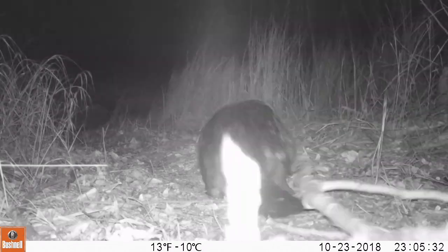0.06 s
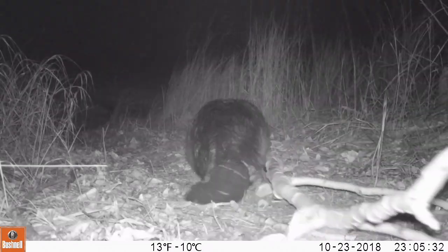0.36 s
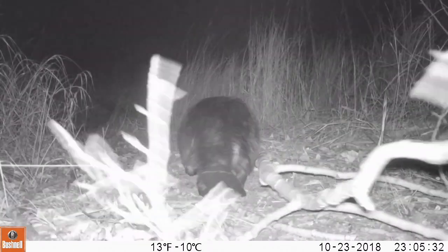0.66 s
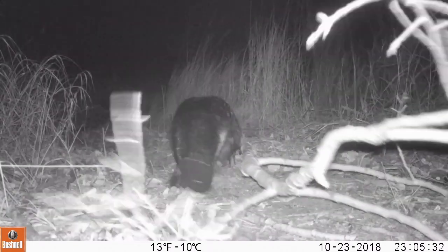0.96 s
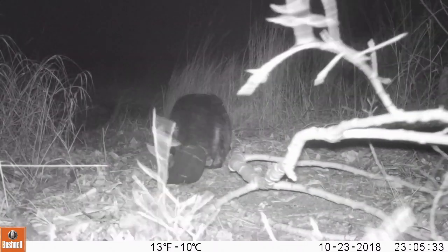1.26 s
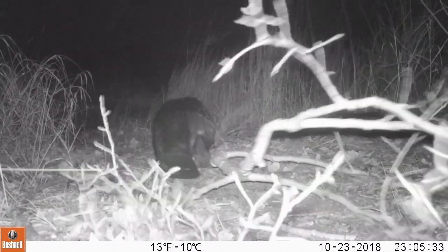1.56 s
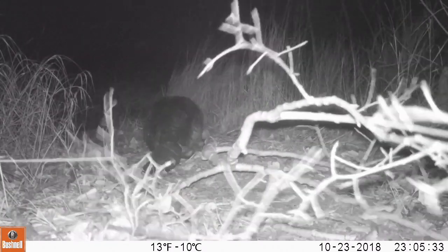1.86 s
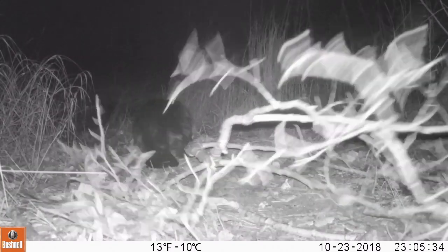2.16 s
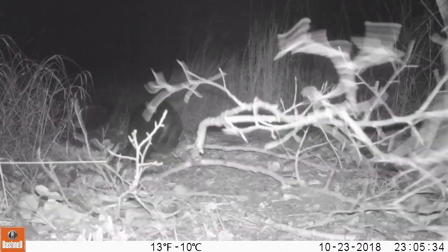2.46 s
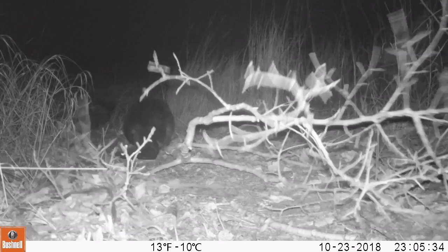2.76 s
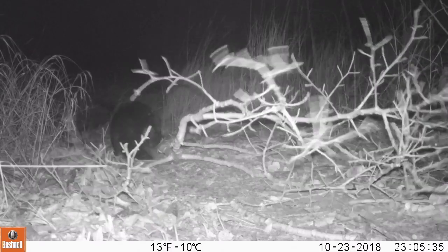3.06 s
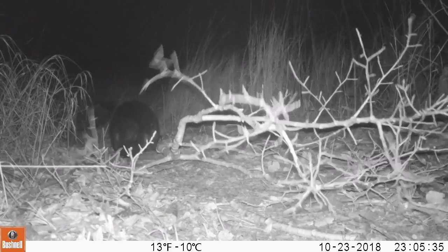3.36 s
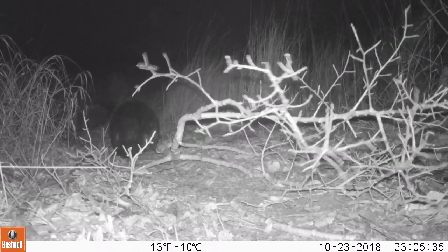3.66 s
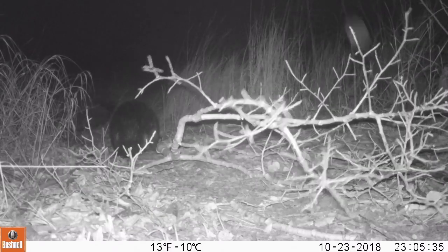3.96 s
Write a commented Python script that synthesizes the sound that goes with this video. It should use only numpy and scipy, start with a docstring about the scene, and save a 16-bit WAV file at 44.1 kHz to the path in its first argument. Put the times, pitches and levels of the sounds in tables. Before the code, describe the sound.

A big branch drags over dry leaves from the start, close by, with dense bright crackling, woody scraping and soft low bumps. It is loudest in the first second, where sharp twig snaps come thick and fast. The rustling then gradually recedes, with scattered weaker snaps, and stops at about 3.3 seconds. A few tiny ticks follow around 3.5 seconds as it settles over faint night hiss.

```python
"""A big dead branch, dragged by a beaver over dry leaves at night, passes close by, recedes and stops.
Twig tips rake the litter into a dense, bright crackle. Stick-slip friction makes the limb scrape and
rub, and bumps on the ground ring its low modes. Twigs snap by brittle fracture or brush past, and a few
leaves settle over the faint hiss and rumble of the night and a small mono microphone."""
import sys
import numpy as np
from scipy import signal
from scipy.fft import rfft, irfft
from scipy.io import wavfile

SR = 44100
rng = np.random.default_rng(int(sys.argv[2]) if len(sys.argv) > 2 else 0)


def output_pcm(signal):
    """Save a mono or channel-first signal as 16-bit PCM at the path in sys.argv[1].

    Samples are clipped to [-1, 1] before scaling.
    """
    pcm = np.clip(np.atleast_2d(signal).T, -1, 1) * 32767
    wavfile.write(sys.argv[1], SR, np.round(pcm).astype(np.int16))


N = 176400
T = np.arange(N) / SR
SLIPS_PER_S, SLIP_SPREAD_DB = 3000, 2

# Relative strength of crackle and scrape along the drag: time_s, leaf_db, wood_db
DRAG = [(0.0, -29.9, -41), (0.07, -32, -45.8), (0.1, -27, -41.5), (0.3, -25, -38.9), (0.41, -25.5, -40.5),
        (0.49, -28, -40), (0.54, -30, -43), (0.66, -29, -45.5), (0.77, -31.5, -49.5), (0.8, -31, -44),
        (0.91, -31.5, -47), (1.02, -32, -44.5), (1.06, -34, -49.5), (1.12, -32.5, -46.5),
        (1.16, -33, -48.5), (1.41, -33, -48.5), (1.52, -36.5, -51.5), (1.58, -33.4, -49.8),
        (1.72, -35, -49.5), (1.77, -36, -52), (2.13, -34.5, -50), (2.17, -39.5, -52.2), (2.21, -35, -50.5),
        (2.3, -39.0, -53.5), (2.45, -36.5, -52), (2.54, -39, -53), (2.77, -40.5, -56), (2.9, -40, -56.5),
        (3.18, -42.2, -57), (3.28, -47, -63.2), (3.45, -60.5, -75), (3.59, -72.0, -79.4),
        (3.81, -81, -83.5), (3.99, -84, -84)]


def from_db(db):
    """Amplitude ratio of a level in decibels."""
    return 10 ** (np.asarray(db) / 20)


def rms_one(x):
    """Normalisation to unit rms."""
    return x / np.sqrt(np.mean(x ** 2) + 1e-20)


def in_time(rows):
    """Linear interpolation of a curve's columns at every sample."""
    times_s, *columns = np.transpose(rows)
    return [np.interp(T, times_s, column) for column in columns]


def drift(rate_hz):
    """Slow random modulation: low-passed noise of unit rms, one value per 40 samples, interpolated."""
    pole = np.exp(-80 * np.pi * rate_hz / SR)
    slow = signal.lfilter([1], [1, -2 * pole, pole * pole], rng.standard_normal(N // 40 + 2002))[2000:]
    return np.interp(np.arange(N) / 40, np.arange(len(slow)), rms_one(slow))


def response(spectrum, size=4096):
    """Minimum-phase impulse response with this spectral shape; peak 1."""
    hz, db = np.transpose(spectrum)
    grid_hz = np.maximum(np.arange(size // 2 + 1) * SR / size, 1)
    magnitude = from_db(np.interp(np.log(grid_hz), np.log(hz), db))
    causal_cepstrum = 2 * irfft(np.log(magnitude)) * (np.arange(size) < size // 2)
    ring = irfft(np.exp(rfft(causal_cepstrum)))
    return ring / np.abs(ring).max()


def at_pitch(shape, pitch_hz):
    """Transposition of a spectrum given in frequency ratios."""
    return [(ratio * pitch_hz, db) for ratio, db in shape]


def through(x, spectrum):
    """Source and filter: an excitation is convolved with the response of a spectrum."""
    return signal.fftconvolve(x, response(spectrum))[:N]


def add(out, start_s, sound):
    """Superposition of a sound from its start time."""
    start = int(np.clip(start_s * SR, 0, N - 1))
    out[start:start + len(sound)] += sound[:N - start]


def grains(per_s, spread_db):
    """Shot noise: random clicks, many small and a few large; rms 1."""
    sizes = from_db(spread_db * np.minimum(rng.exponential(1, N), 5))
    return rms_one(sizes * rng.choice([-1, 1], N) * (rng.random(N) < per_s / SR))


def leaf_crackle(catch):
    """Twig tips excite leaves with random impulses; with distance the crackles merge into a swish."""
    # Spectra of leaves close by and farther off: frequency_hz, gain_db
    near_spectrum = [(1000, -51), (2000, -36), (3500, -19.5), (5160, -8.5), (6000, -2), (6600, 1),
                     (7500, -2), (9400, -6.5), (11000, -11), (12800, -19), (15800, -24)]
    far_spectrum = [(1000, -51), (2000, -32), (3500, -22), (4200, -17), (4600, -18), (5000, -11.5),
                    (5700, -4.5), (6600, -0.4), (7500, -2.5), (9400, -7), (11000, -12), (12800, -20.5),
                    (15800, -29)]
    near_until_s, far_from_s = 0.6, 2.07
    near_crisp, far_crisp = 0.47, 0.25  # share of the power in distinct crackles
    level_db, _ = in_time(DRAG)
    far = np.clip((T - near_until_s) / (far_from_s - near_until_s), 0, 1)
    out = np.zeros(N)
    for spectrum, crisp, share in ((near_spectrum, near_crisp, 1 - far), (far_spectrum, far_crisp, far)):
        crackles = np.sqrt(crisp) * grains(per_s=1800, spread_db=1.5)
        swish = np.sqrt(1 - crisp) * rng.standard_normal(N)
        out += np.sqrt(share) * rms_one(through(crackles + swish, spectrum))
    return out * from_db(level_db - 0.23 + 0.9 * catch)


def wood_scrape(catch):
    """Stick-slip friction: tiny slips of bark and twigs excite the resonances of the branch."""
    # Spectrum of the scraped wood: frequency_hz, gain_db
    wood_spectrum = [(500, -25.5), (1080, -11), (1350, -7), (1900, -7.5), (2350, -5.5), (2750, -0.5),
                     (3300, -1.5), (4300, 0), (5500, -2.5), (9000, -28)]
    _, level_db = in_time(DRAG)
    scrape = through(grains(SLIPS_PER_S, SLIP_SPREAD_DB), wood_spectrum)
    return rms_one(scrape) * from_db(level_db - 0.5 + 0.82 * catch)


def soil_rub(catch):
    """Sliding friction: the heavy limb rubs dully over the frozen ground."""
    # Strength of the rub under the limb's weight: time_s, relative_db
    load_curve = [(0.0, -57), (0.01, -60), (0.28, -54), (0.71, -56), (0.75, -59.5), (0.85, -56),
                  (0.89, -59.5), (1.55, -61.5), (1.56, -59), (3.17, -69.5), (3.5, -83), (4.0, -82.5)]
    # Spectrum of the rubbed soil: frequency_hz, gain_db
    soil_spectrum = [(30, -22.5), (60, -14.5), (100, -0.5), (250, -0.5), (340, -2), (550, -1.5), (720, 2.5),
                     (880, 1), (1060, -2.5), (1400, -4), (3500, -19)]
    level_db, = in_time(load_curve)
    rub = through(grains(SLIPS_PER_S, SLIP_SPREAD_DB), soil_spectrum)
    return rms_one(rub) * from_db(level_db + 3 + 1.25 * catch)


def ground_echo(direct, delay_s=0.00042, cutoff_hz=1700, full_at_s=2.73):
    """Interference: as the branch recedes, the ground reflection grows and hollows out the midrange."""
    dull = signal.sosfilt(signal.butter(1, cutoff_hz, fs=SR, output="sos"), direct)
    reflected = np.interp(T - delay_s, T, dull)
    gain = 0.5 * np.minimum(T / full_at_s, 1)
    return (direct + gain * reflected) / np.sqrt(1 + gain ** 2)


def hiss(level_db=-72):
    """Stationary noise: the hiss and low rumble of the still night and the microphone."""
    # Spectrum of the noise floor: frequency_hz, gain_db
    floor_spectrum = [(15, -32.5), (25, -9), (34, -1.5), (60, -9), (130, -13), (270, -18.5), (500, -29),
                      (1000, -28), (2000, -29.5), (7000, -31), (15500, -31)]
    return from_db(level_db) * rms_one(through(rng.standard_normal(N), floor_spectrum))


def limb_bumps(rise_s=0.0069):
    """Damped modal vibration: soft blows ring the limb, a little differently each time."""
    # Blows of the limb on the ground: start_s, relative_db
    blows = [(0.038, -44), (0.17, -40), (0.245, -39), (0.352, -59), (0.454, -46), (0.718, -53),
             (0.798, -46), (0.938, -57), (1.03, -52), (1.248, -54), (1.692, -53), (1.801, -43),
             (2.049, -49), (2.427, -52), (2.849, -58), (2.998, -58)]
    # Low modes of the limb: frequency_hz, gain_db, t60_s
    limb_modes = [(95, 0, 0.11), (139, 4.5, 0.069), (195, -4, .08), (244, -5.5, 0.072)]
    out, t = np.zeros(N), T[:9000]
    onset = 1 - np.exp(-t / rise_s)
    for start_s, blow_db in blows:
        for hz, mode_db, t60_s in limb_modes:
            detune, force = rng.standard_normal(2)
            ring = np.sin(2 * np.pi * hz * (1 + 0.087 * detune) * t) * from_db(-60 * t / t60_s)
            add(out, start_s, from_db(blow_db - 7 + mode_db + 2 * force) * ring * onset)
    return out


def twig_snaps(strain_s=0.0015, splinter_s=0.0016, knock_s=0.002):
    """Brittle fracture: each twig strains, breaks in one sharp crack, then splinters with a woody knock."""
    # Breaking twigs: break_s, level_db, pitch_hz, knock_offset_db
    breaks = [(0.0428, -6, 7200.0, -30), (0.1549, -13, 7100.0, -26), (0.1845, -9, 7600.0, -23),
              (0.2182, -12, 6500.0, -25), (0.3086, -6, 8100.0, -31), (0.3475, -10, 6700.0, -25),
              (0.3643, -12, 6600.0, -23), (0.4099, -11, 7200.0, -24), (0.5041, -14, 7600.0, -16),
              (0.5768, -17, 6500.0, -23), (0.6683, -15, 6600.0, -27), (0.6773, -11, 7900.0, -33),
              (0.7112, -15, 7100.0, -23), (0.7257, -16, 5500.0, -28), (0.7781, -11, 6600.0, -31),
              (0.7936, -8, 7700.0, -33), (0.802, -16, 7600.0, -21), (0.81, -13, 7200.0, -28),
              (0.8125, -13, 7300.0, -27), (0.8372, -17, 6100.0, -15), (0.841, -14, 7900.0, -22),
              (0.8487, -17, 7800.0, -28), (1.0117, -5, 7300.0, -26), (1.0887, -19, 6800.0, -25),
              (1.1176, -14, 7500.0, -29), (1.1212, -16, 7600.0, -28), (1.1253, -16, 8300.0, -30),
              (1.5639, -20, 7200.0, -26), (1.5822, -16, 7100.0, -19), (1.5879, -14, 7200.0, -27),
              (1.8008, -21, 7000.0, -27), (2.3534, -23, 7200.0, -22), (2.425, -22, 7600.0, -29),
              (2.8688, -26, 7100.0, -26), (3.0032, -25, 7300.0, -27), (3.171, -28, 7800.0, -30),
              (3.3016, -33, 8100.0, -24), (3.4989, -47, 8500.0, -24), (3.5035, -49, 9300.0, -25),
              (3.636, -51, 7500.0, -25)]
    # Spectrum of the crack: pitch_ratio, gain_db
    crack_shape = [(.04, -42.5), (.14, -31.5), (.28, -28), (.55, -15), (.8, -8.5), (1, 1.5), (1.2, -7),
                   (1.5, -13), (1.8, -26), (2.2, -21)]
    # Spectrum of the woody knock: frequency_hz, gain_db
    knock_spectrum = [(150, -29.5), (450, -10), (750, -7.5), (1050, -7.5), (1500, -1), (2400, -2.5),
                      (4000, -4), (6000, -18), (9000, -38.5)]
    size, lead = 1500, 300  # samples after and before the break
    out, t, body = np.zeros(N), T[:size], response(knock_spectrum)
    strain = from_db(-27.5) * np.exp(-t[:lead] / strain_s)[::-1]  # fibres crackle before giving way
    splinter = from_db(-21) * np.exp(-t / splinter_s)
    for break_s, level_db, pitch_hz, knock_offset_db in breaks:
        fracture = rng.standard_normal(lead + size) * np.r_[strain, splinter]
        fracture[lead] = 1  # the break itself
        crack = signal.fftconvolve(fracture, response(at_pitch(crack_shape, pitch_hz)))
        knock = signal.fftconvolve(rng.standard_normal(size) * np.exp(-t / knock_s), body)
        add(out, break_s - lead / SR, from_db(level_db) * crack / np.abs(crack).max())
        add(out, break_s, from_db(level_db + knock_offset_db - 3) * knock / np.abs(knock).max())
    return out


def brushes(rise_share=0.73):
    """Brief friction: a twig, bough or leaf flicks past in a swell of slips around its own pitch."""
    # Glancing contacts, the last as the branch settles: start_s, length_s, level_db, pitch_hz
    contacts = [(0.18, 0.0063, -24.5, 7340), (0.304, 0.035, -35, 4560), (.34, 0.015, -34.5, 4330),
                (0.384, 0.041, -35.5, 4770), (0.496, 0.014, -43.5, 2880), (.664, 0.014, -30.5, 7000),
                (.722, 0.0075, -36.5, 3930), (0.774, 0.0056, -31, 6000), (0.791, 0.024, -35.5, 4860),
                (0.796, .02, -30, 7660), (0.833, .012, -40, 3220), (0.836, 0.023, -51, 800),
                (.838, .016, -37, 9500), (1.108, 0.015, -36, 8800), (1.551, .014, -36.5, 10500),
                (1.579, 0.013, -31, 7400), (1.579, .014, -49.5, 2860), (1.613, 0.052, -40.5, 9450),
                (1.879, 0.022, -57, 750), (3.495, .012, -65, 9500), (3.553, .022, -66, 6960),
                (3.628, 0.022, -68, 6800), (3.64, .06, -70, 6900)]
    # Spectrum of one contact: pitch_ratio, gain_db
    brush_shape = [(.3, -34.5), (.65, -16), (.85, -5), (1, 6), (1.2, -3), (1.5, -12), (2.5, -31.5)]
    out, slips = np.zeros(N), grains(SLIPS_PER_S, SLIP_SPREAD_DB)
    for start_s, length_s, level_db, pitch_hz in contacts:
        start, size = int(start_s * SR), int(length_s * SR)
        swell = np.interp(np.linspace(0, 1, size), [0, rise_share, 1], [0, 1, 0])
        friction = slips[start:start + size] * np.sqrt(swell)
        sound = signal.fftconvolve(friction, response(at_pitch(brush_shape, pitch_hz)))
        add(out, start_s, from_db(level_db) * sound * np.sqrt(size) / np.linalg.norm(sound))
    return out


def scene(twig_top_hz=11500):
    """Superposition: all sources sum at one microphone, alike in both channels."""
    catch = drift(rate_hz=44)  # twigs catch and let go, modulating crackle, scrape and rub together
    branch = ground_echo(wood_scrape(catch) + soil_rub(catch))
    twig_rolloff = signal.butter(2, twig_top_hz, fs=SR, output="sos")
    twigs = signal.sosfilt(twig_rolloff, brushes() + twig_snaps())
    mono = leaf_crackle(catch) + branch + twigs + limb_bumps() + hiss()
    return np.array([mono, mono])


def record(dry, cutoff_hz=15750):
    """Band limiting: a steep low-pass filter removes the highest treble."""
    taps = signal.firwin(401, cutoff_hz, fs=SR, window=("kaiser", 8))
    return signal.fftconvolve(dry, taps[None], mode="same", axes=1)


dry = scene()
out = record(dry)
output_pcm(out)
```